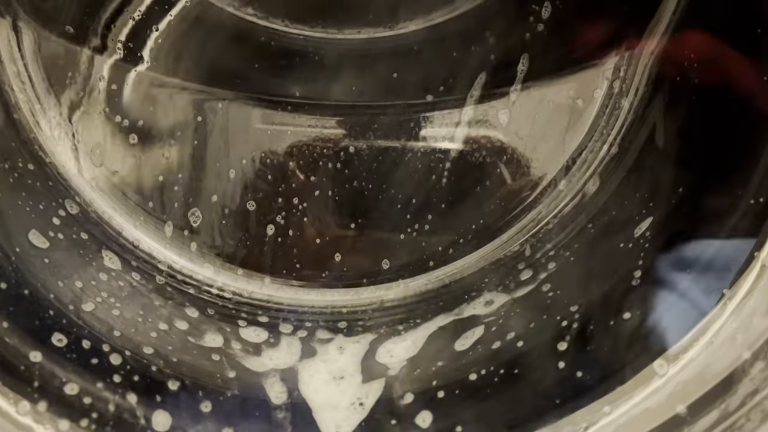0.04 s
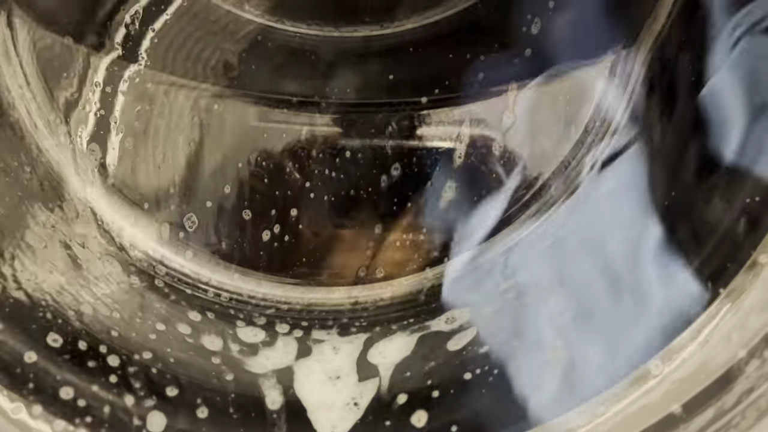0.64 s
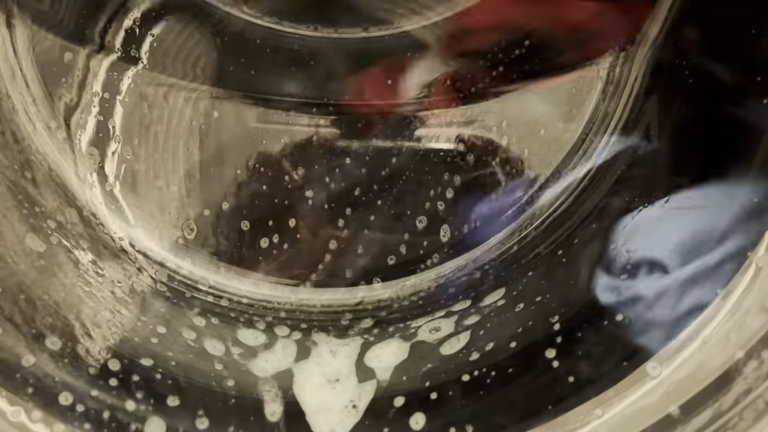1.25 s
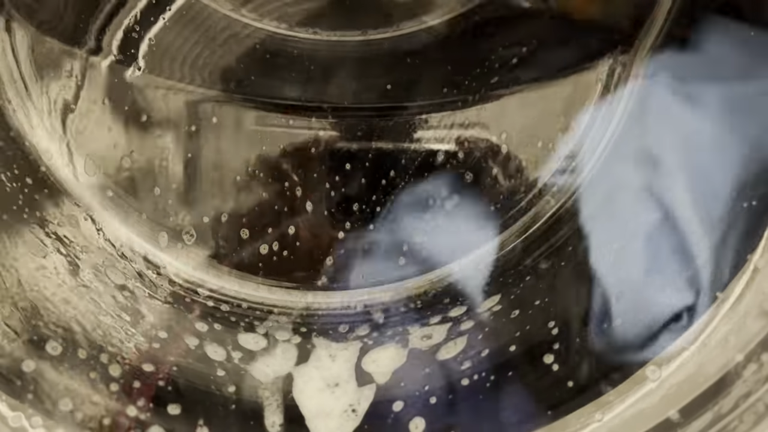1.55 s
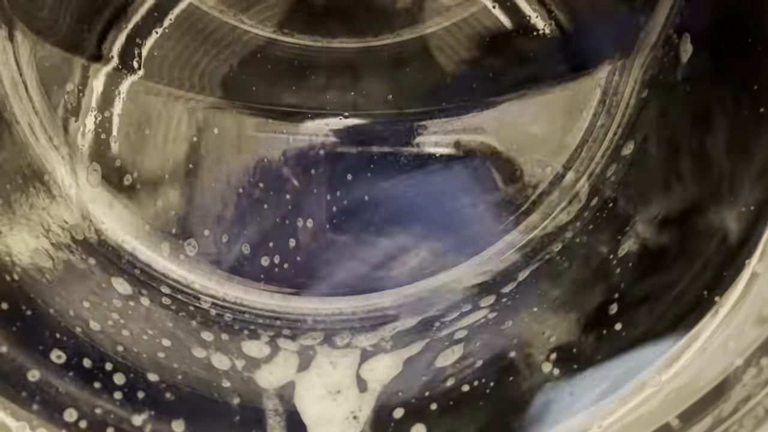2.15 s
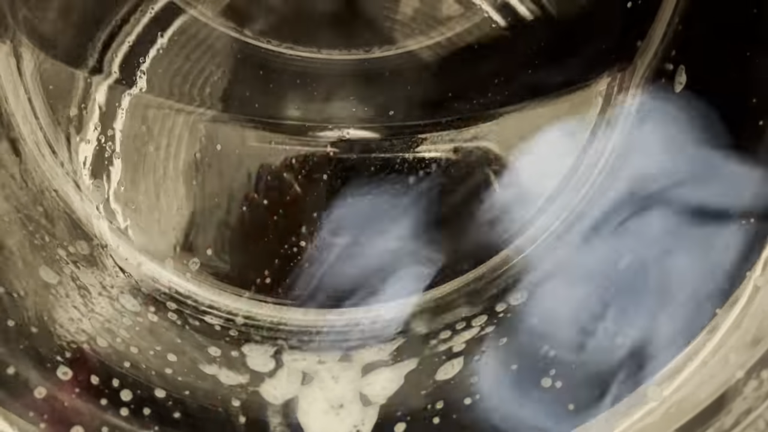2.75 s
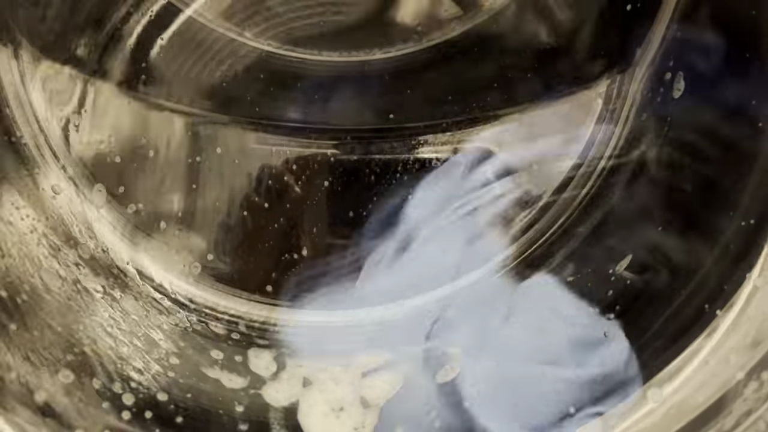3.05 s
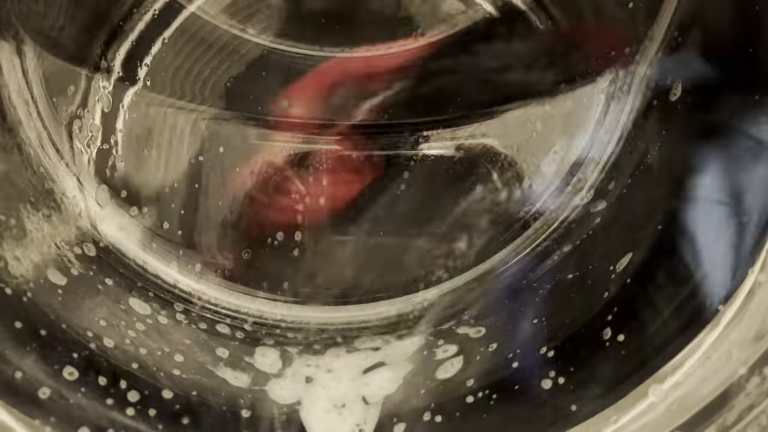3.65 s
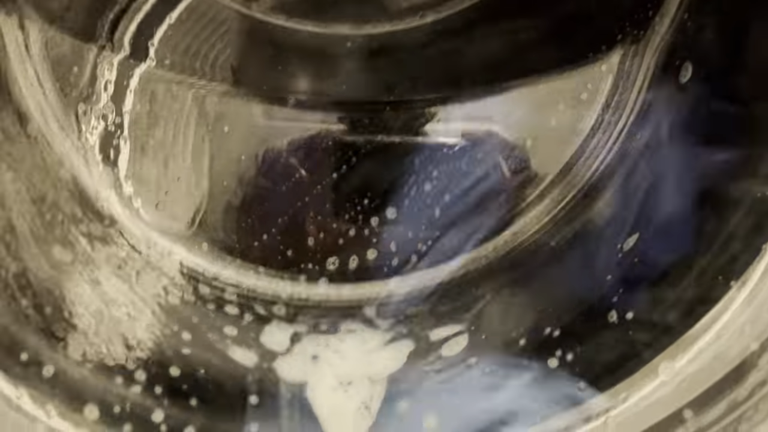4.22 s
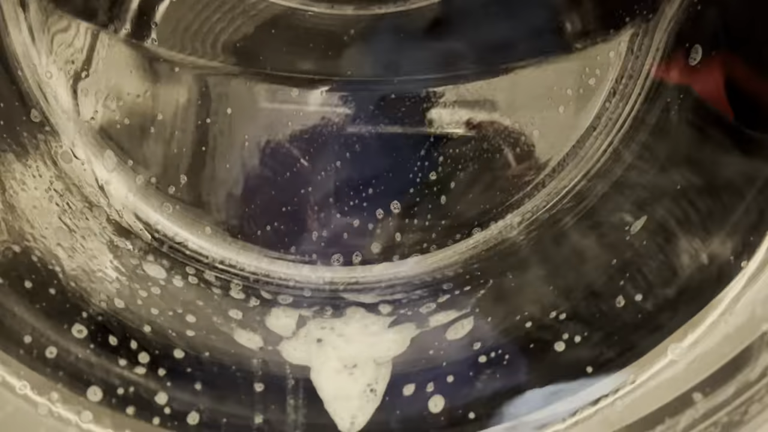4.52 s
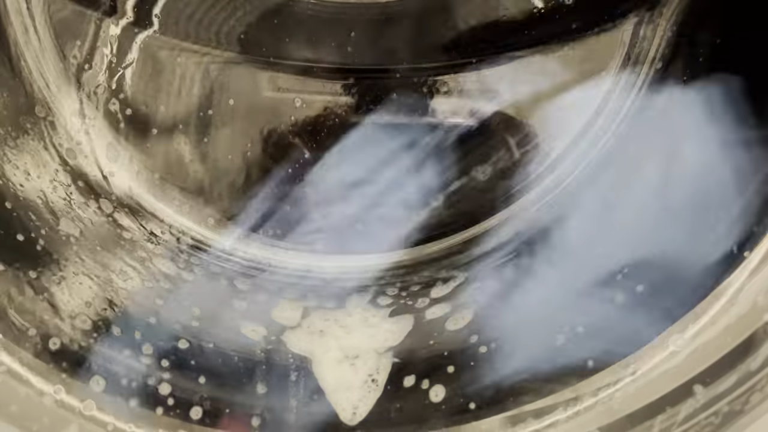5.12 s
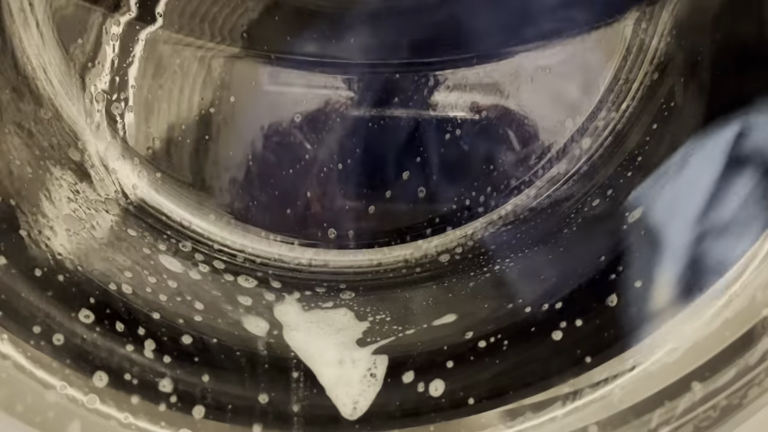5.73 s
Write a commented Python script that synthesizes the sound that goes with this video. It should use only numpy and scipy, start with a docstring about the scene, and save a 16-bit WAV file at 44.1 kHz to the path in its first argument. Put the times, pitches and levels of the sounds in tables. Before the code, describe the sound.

A front-loading washing machine turns with a steady low rumble, a motor hum and a faint, thin whine. Wet laundry slaps the drum and flops into the water at uneven intervals, and the water sloshes, gurgles and spatters. A zip or button ticks on the glass early on, then one heavy knock rings briefly in the steel tub, and more wet smacks follow. The microphone is just outside the glass door.

```python
"""Front-loading washing machine rinsing

Heard just outside the glass door. Wet laundry slaps the turning drum and flops into the water, which
sloshes, bubbles and spatters; a zip or button ticks on the glass. These ring briefly in the steel tub,
over the rumble and hum of the drive and the thin whine of its inverter."""
import sys
import numpy as np
from scipy import signal
from scipy.fft import rfft, irfft, next_fast_len
from scipy.io import wavfile
from scipy.ndimage import uniform_filter1d

SR = 44100
rng = np.random.default_rng(int(sys.argv[2]) if len(sys.argv) > 2 else 0)


def inscribe(sig):
    """Save sig as 16-bit PCM at rate SR to the path in sys.argv[1].

    A 1-D sig is mono; a 2-D sig holds one channel per row.
    Samples are clipped to [-1, 1] before scaling.
    """
    pcm = np.round(np.clip(np.atleast_2d(sig).T, -1, 1) * 32767)
    wavfile.write(sys.argv[1], SR, pcm.astype(np.int16))


N = 259308
TIME_S = np.arange(N) / SR
FFT_SIZE = next_fast_len(N + SR // 2)
FREQ_HZ = np.maximum(np.fft.rfftfreq(FFT_SIZE, 1 / SR), 1)

# Drum and bearing noise. Each row: frequency in Hz, relative level in dB.
DRIVE_SPECTRUM = [(13, -68), (22, -9.5), (125, 1), (167, 0), (493, -12), (598, -9), (880, -16.5),
                  (1120, -16.5), (1530, -24), (1810, -28.5), (3080, -34), (3400, -37.5), (5910, -47),
                  (7000, -53), (9100, -83), (15400, -120)]
# Motor hum. Each row: frequency in Hz, base level in dB.
HUM_PARTIALS = [(70, -56), (114, -55), (240, -82)]
# Tub swinging on its springs. Each row: start in seconds, pitch in Hz, peak in dB.
SPRING_BUMPS = [(3.289, 66, -38), (3.628, 67.5, -46), (5.022, 79, -34.5)]
# Tub and door resonances. Each row: frequency in Hz, width in Hz, relative gain in dB.
TUB_MODES = [(359, 21, 0.5), (618, 41, 5.5), (761, 29, 1.5), (909, 9.1, 1), (1086, 14.5, 4.5),
             (1210, 29, 3), (1532, 22, 8), (1540, 10, -15), (1970, 67, -0.5), (2830, 15, -8), (3230, 57, 0)]
# Ring common to all ticks. Each row: frequency in Hz, width in Hz, relative gain in dB.
TICK_MODES = [(3190, 61, 8), (6130, 130, -3), (9100, 85, -3), (10500, 2900, 1.5), (11700, 270, 10),
              (13300, 370, 4)]
# Zip or button on glass. Each row: start in seconds, level in dB, contact in seconds, spot pitch in Hz.
GLASS_TICKS = [(0.525, -31, 0.0033, 12500), (0.584, -43.5, 0.007, 11650), (0.615, -60, 0.049, 11400),
               (0.78, -24, 0.0026, 12600), (0.853, -27, 0.0059, 10830), (0.888, -41, .008, 12400),
               (1.83, -31, 0.0044, 12400), (1.841, -43, 0.013, 10800), (1.857, -42.5, 0.019, 10800),
               (1.877, -47, 0.0056, 10300), (2.983, -43, 0.0019, 11200), (4.426, -57, .003, 11000),
               (5.608, -50, .004, 11800)]
# Drop impacts. Each row: frequency in Hz, relative level in dB.
SPLASH_SPECTRUM = [(65, -36), (110, -12.5), (250, -12.5), (514, -10), (632, -0.5), (730, -5.5), (915, -8.5),
                   (4640, -21.5), (6450, -23), (8610, -40), (10100, -34), (15000, -46)]
# Large air pockets. Each row: start in seconds, pitch in Hz, level in dB, glide as a share of pitch.
AIR_GULPS = [(0.0, 343, -19, 0.25), (0.0, 532, -25.5, -0.07), (0.017, 408, -21, 0.21),
             (0.046, 650, -36, 0.11), (0.938, 187.4, -27, 0.04), (1.06, 324.4, -35, 0.03),
             (1.265, 260, -39, 0.013), (2.513, 152, -29.5, 0.016), (3.125, 252, -35, 0.04),
             (3.305, 161, -32, 0.13), (3.415, 600, -27.5, 0.0017), (3.474, 447, -35, 0.077),
             (3.504, 302, -33, -0.048), (4.468, 670, -24, 0.054), (4.488, 378, -25.5, 0.067),
             (4.506, 263, -28, 0.033), (4.63, 376, -38, 0.16), (4.98, 650, -26.5, -0.0037),
             (5.051, 330, -32, 0.11), (5.335, 263, -33, 0.04), (5.615, 292, -19, 0.23),
             (5.637, 374, -20.5, -0.03)]
# Air from wet folds. Each row: start in seconds, pitch in Hz, level in dB, squeeze time in seconds.
FOLD_SMACKS = [(0.167, 910, -39, 0.016), (0.49, 1190, -48, 0.012), (0.594, 1170, -41, .008),
               (0.728, 6600, -32.5, .003), (0.737, 1370, -39, .008), (1.338, 1130, -35, 0.013),
               (1.57, 1090, -48, 0.0048), (1.673, 900, -37.5, .014), (1.769, 2080, -45, 0.019),
               (2.159, 1500, -41.5, 0.0059), (2.511, 1010, -43, 0.0056), (2.568, 1200, -39, 0.014),
               (2.696, 1490, -36.5, 0.0081), (2.713, 1105, -31, 0.016), (2.764, 1110, -37, .01),
               (3.088, 2200, -49, .008), (3.17, 2800, -27, 0.0093), (3.173, 1190, -39, .014),
               (3.413, 1520, -52, 0.0041), (3.474, 1520, -38, .012), (3.886, 2140, -23.5, 0.0099),
               (3.891, 940, -24.5, 0.012), (4.254, 2020, -40, .025), (4.314, 1230, -39, 0.021),
               (4.425, 1270, -36, 0.015), (5.02, 1400, -39, .022), (5.043, 2300, -48, 0.012),
               (5.127, 1510, -57, .008), (5.325, 1150, -43, 0.0064), (5.609, 2360, -32, 0.016),
               (5.617, 1440, -24, .014)]
# Heavy bundles on steel. Each row: start in seconds, level in dB, pitch region in Hz.
BUNDLE_KNOCKS = [(0.737, -23, 640), (1.882, -11.5, 974), (1.885, -28, 1240), (3.175, -27, 2820),
                 (3.89, -35, 2050)]
# Flat cloth on the drum wall. Each row: start in seconds, level in dB, pitch in Hz.
CLOTH_SLAPS = [(0.737, -34, 680), (1.308, -35, 700), (1.8795, -30, 2500), (1.8825, -24, 1050),
               (2.156, -40, 1400), (2.511, -37, 800), (2.713, -27, 850), (3.1695, -27, 2700),
               (3.173, -24, 1040), (3.415, -32, 650), (3.883, -34, 2100), (3.892, -21.5, 850),
               (4.4245, -26, 3600), (4.601, -32, 650), (4.802, -38, 700), (4.981, -26, 680),
               (5.276, -44, 900), (5.61, -20, 3000), (5.617, -26, 640)]
# Thud, slap, splat and spray of a landing. Each row: low edge in Hz, high edge in Hz.
PART_BANDS = [(130, 419), (450, 998), (1050, 4300), (3400, 34000)]
# The same four parts. Each row: base level in dB, dB per dB of strength, dB per dB of wetness.
PART_LEVELS = [(-36.5, 0.7446, -0.52), (-35, 1.18, 0.09), (-45, 1.29, 1.3666), (-57.5, 0.7, 2.12)]
# Wet laundry landing. Each row: time in seconds, contact in seconds, strength in dB, wetness in dB
# (above 0 a bright smack, below 0 a dull plop).
LANDINGS = [(0.0, 0.019, -4.5, -1), (0.152, 0.0041, -7, 3.5), (0.218, 0.0015, -18, 5),
            (0.316, 0.042, -13, 0), (0.47, 0.0011, -3, 6), (0.488, 0.005, -5.5, 7.5),
            (0.587, 0.0081, -3, 0.5), (0.727, 0.0046, 3.5, 3), (0.85, 0.038, -8, 2.5),
            (0.917, 0.0056, -3.5, -3), (1.038, 0.0012, -7.5, -12), (1.243, 0.0031, -4.5, -0.5),
            (1.305, 0.0012, -1.5, -1), (1.335, 0.0082, -8, -1.5), (1.569, 0.019, -9.5, 1),
            (1.664, 0.0036, -3, -1), (1.811, 0.015, -0.5, 4.5), (1.879, 0.0023, 13, -2.5),
            (2.082, 0.002, -11.5, 3.5), (2.152, 0.0062, -7, 2), (2.507, 0.0071, -0.5, 0),
            (2.695, 0.0015, -3.5, 5), (2.712, 0.0058, 2, 1), (2.839, 0.0012, -3, 0.5),
            (2.984, 0.0003, -2, 6), (3.084, 0.0074, -2, 3.5), (3.167, 0.00061, 8.5, 5),
            (3.289, 0.0022, -4.5, 2), (3.411, 0.00098, -1.5, 2.5), (3.454, 0.0065, 0, -2),
            (3.617, 0.0025, -2, -2.5), (3.645, 0.0034, -0.5, 2), (3.88, 0.0064, 5.5, 3),
            (4.053, 0.0054, -11, 8.5), (4.077, 0.0019, -1, 5), (4.079, 0.013, -5, 0.5),
            (4.252, 0.027, -8.5, 2), (4.345, 0.013, -7, 0.5), (4.423, 0.0032, 5, 4),
            (4.465, 0.00076, -0.5, -8), (4.601, 0.0024, -3.5, -0.5), (4.622, 0.0061, -1, -4),
            (4.797, 0.00084, -5, 1), (4.937, 0.031, -5.5, 0), (4.98, 0.003, -10, -4),
            (5.021, 0.018, -4, -2.5), (5.118, 0.004, -7, 1.5), (5.272, 0.00064, 0, 1),
            (5.484, 0.0016, -6, -0.5), (5.608, 0.00065, 9.5, 7), (5.617, 0.01, 5, -4),
            (5.808, 0.0066, -10, -0.5)]


def undb(db):
    """Decibels to gain."""
    return 10 ** (np.asarray(db) / 20)


def unit_rms(x):
    """Scale to rms 1."""
    return x / np.sqrt(np.mean(x ** 2))


def unit_energy(x):
    """Scale each channel to energy 1."""
    return x / np.sqrt(np.sum(x ** 2, axis=-1, keepdims=True))


def add_at(out, start_s, sound):
    """Mix a sound into out, in place."""
    start = int(start_s * SR)
    out[start:start + len(sound)] += sound


def leak(x, decay_s):
    """Leaky integrator, gain 1 at DC."""
    keep = np.exp(-1 / (decay_s * SR))
    return signal.lfilter([1 - keep], [1, -keep], x)


def filt(x, response):
    """Apply a response given on FREQ_HZ."""
    return irfft(rfft(x, FFT_SIZE) * response, FFT_SIZE)[..., :N]


def colour(points):
    """Response through (Hz, dB) points."""
    hz, db = np.transpose(points)
    return undb(np.interp(np.log(FREQ_HZ), np.log(hz), db))


def mode(hz, width_hz):
    """One resonance, gain 1 at its centre."""
    return 1 / (1 + 1j * (FREQ_HZ ** 2 - hz ** 2) / (FREQ_HZ * width_hz))


def band(x, lo_hz, hi_hz):
    """Causal band-pass, capped below Nyquist."""
    sos = signal.butter(3, [lo_hz, min(hi_hz, SR / 2 - 1)], "band", fs=SR, output="sos")
    return signal.sosfilt(sos, x)


def walk(rate_hz):
    """Smooth random drift, rms 1."""
    hold = int(SR / rate_hz)
    steps = np.repeat(rng.standard_normal(N // hold + 1), hold)
    return unit_rms(uniform_filter1d(uniform_filter1d(steps, hold), hold)[:N])


def impacts(rate_hz, spread_db):
    """Dense tiny impacts of very unequal size."""
    size = undb(spread_db * np.minimum(rng.exponential(size=N), 4))
    return rng.standard_normal(N) * size * (rng.random(N) < rate_hz / SR)


def stereo(mid, side, wide_hz):
    """Long waves reach both ears alike, short ones unrelated."""
    share = 1 / np.sqrt(1 + (wide_hz / FREQ_HZ) ** 2)
    norm = 1 / np.sqrt(1 + share ** 2)
    return filt(mid, norm) + np.array([[1], [-1]]) * filt(side, share * norm)


def drive(stir_db, noise_db=-46.5, sway_db=1, wander_rad=1.65, whine_hz=15030, whine_db=-63.5):
    """Drum and bearings rumble under the shifting load; the motor hums, its inverter whines."""
    effort = undb(0.087 * stir_db - 1.4 * walk(4.84))
    noise = filt(rng.standard_normal((2, N)), colour(DRIVE_SPECTRUM))
    noise = unit_rms(stereo(*noise, wide_hz=560)) * undb(noise_db + sway_db * walk(5.4))
    rumble = filt(noise, 1 / (1 + (FREQ_HZ / 160) ** 4))
    hum = 0
    for hz, db in HUM_PARTIALS:
        amplitude = np.sqrt(2) * undb(db + 2 * walk(9))
        hum += amplitude * np.sin(2 * np.pi * hz * TIME_S + wander_rad * walk(26))
    whine = unit_rms(filt(rng.standard_normal(N), mode(whine_hz, width_hz=110) ** 3))
    return effort * (rumble + hum) + (noise - rumble) + undb(whine_db) * whine


def bumps(swell_s=0.022):
    """The load bumps the sprung tub, which gives softly and swings a few cycles."""
    out = 0
    for start_s, hz, db in SPRING_BUMPS:
        age_s = np.maximum(TIME_S - start_s, 0)
        swell = (age_s / swell_s * np.exp(1 - age_s / swell_s)) ** 2
        out += undb(db) * swell * np.sin(2 * np.pi * hz * age_s)
    return out


def pool_resonance(x, hz=240, width_hz=16, gain_db=8, drift_octaves=0.082):
    """The tub's lowest resonance carries the water, so it drifts as the load shifts."""
    pitch_hz = hz * 2 ** (drift_octaves * walk(6.8))
    carrier = np.exp(2j * np.pi * np.cumsum(pitch_hz) / SR)
    return undb(gain_db) * np.real(carrier * leak(x / carrier, decay_s=1 / (np.pi * width_hz)))


def tub_body(x):
    """Standing resonances of the steel plus the drifting one of the pool."""
    steel = 1 + sum(undb(db) * mode(hz, width_hz) for hz, width_hz, db in TUB_MODES) / 2
    return filt(x, steel) + pool_resonance(x)


def tub_echoes(x, t60_low_s=0.39, t60_high_s=0.27, direct_db=-9, ring_db=-2.5):
    """Dense echoes in the steel tub; the tumbling load keeps changing their pattern."""
    noise = rng.standard_normal((2, N))
    low = filt(noise, 1 / (1 + (FREQ_HZ / 900) ** 2))
    high = noise - low
    hop, age_s = SR // 16, TIME_S[:SR // 2]
    fade_low, fade_high = undb(-60 * age_s / t60_low_s), undb(-60 * age_s / t60_high_s)
    echoes, padded = np.zeros((2, N + SR)), np.pad(x, (hop, 2 * hop))
    window = np.sin(np.pi * np.arange(2 * hop) / (2 * hop))
    for start in range(0, N + hop, hop):
        pick = rng.integers(N - len(age_s)) + np.arange(len(age_s))
        tail = unit_energy(low[:, pick] * fade_low + high[:, pick] * fade_high)
        frame = window * padded[start:start + 2 * hop]
        echo = signal.fftconvolve(frame[None], tail, axes=1)
        echoes[:, start:start + echo.shape[1]] += echo
    ring = stereo(*tub_body(echoes[:, hop:hop + N]), wide_hz=332)
    return undb(ring_db) * ring + undb(direct_db) * x


def door(x, t60_s, ring_db, direct_db):
    """The glass bowl rings very briefly."""
    tail = unit_energy(rng.standard_normal((2, N)) * undb(-60 * TIME_S / t60_s))
    return undb(direct_db) * x + undb(ring_db) * filt(x, rfft(tail, FFT_SIZE))


def ticks(top_hz=14500, spot_db=16, spot_width_hz=130, rise_s=0.000079, detune=0.0043):
    """Metal clicks on the glass or grazes it; each spot of contact favours its own pitch."""
    out, age_s = np.zeros(N + SR), TIME_S[:SR // 8]
    grit = unit_rms(impacts(rate_hz=15000, spread_db=3))
    for start_s, db, contact_s, spot_hz in GLASS_TICKS:
        start = int(start_s * SR)
        contact = (1 - np.exp(-age_s / rise_s)) * np.exp(-age_s / contact_s)
        force = contact * grit[start:start + len(age_s)]
        ring = 0
        for hz, width_hz, mode_db in TICK_MODES + [(spot_hz, spot_width_hz, spot_db)]:
            pitch_hz = hz * (1 + detune * rng.standard_normal())
            envelope = undb(mode_db) * width_hz * np.exp(-np.pi * width_hz * age_s)
            ring += envelope * np.cos(2 * np.pi * pitch_hz * age_s)
        add_at(out, start_s, undb(db) * signal.fftconvolve(force, unit_energy(ring)))
    return filt(out[:N], 1 / (1 + (FREQ_HZ / top_hz) ** 20))


def bubble(hz, cycles, glide):
    """An air pocket rings briefly; positive glide lifts its pitch as it surfaces."""
    age = TIME_S[:int(2 * cycles / hz * SR)] * hz / cycles
    envelope = np.exp(-np.pi * age) * (1 - np.exp(-2 * cycles * age))
    return envelope * np.sin(2 * np.pi * cycles * age * (1 + glide * age / 2))


def swarm(count, lo_hz, hi_hz, cycles, spread_db, glide):
    """Bubbles of all sizes at random times."""
    out = np.zeros(N + SR)
    for when, pitch, size in rng.random((count, 3)):
        ring = bubble(lo_hz * (hi_hz / lo_hz) ** pitch, cycles, glide)
        add_at(out, when * N / SR, ring * undb(-spread_db * np.log(max(size, 0.05))))
    return unit_rms(out[:N])


def water(stir_db, period_s=0.8, crest_s=0.15, swing_db=3, gurgle_db=-52, drip_db=-62, fizz_db=-66):
    """Pockets gurgle as the load churns and the pool swings; drops trickle off the drum wall."""
    surge_db = swing_db * np.cos(2 * np.pi * (TIME_S - crest_s) / period_s) + walk(4)
    slosh, trickle = undb(0.34 * stir_db + surge_db), undb(0.2 * stir_db + surge_db)
    gurgle = swarm(count=650, lo_hz=132.5, hi_hz=990, cycles=5.1, spread_db=6.5, glide=0.087)
    drips = swarm(count=700, lo_hz=560, hi_hz=1600, cycles=6, spread_db=4, glide=0.15)
    patter = filt(impacts(rate_hz=1000, spread_db=3.6), colour(SPLASH_SPECTRUM))
    fizz = unit_rms(band(patter, 780, 11000))
    return slosh * undb(gurgle_db) * gurgle + trickle * (undb(drip_db) * drips + undb(fizz_db) * fizz)


def gulps():
    """The biggest pockets escape one by one; higher ones die sooner."""
    out = np.zeros(N + SR)
    for start_s, hz, db, glide in AIR_GULPS:
        add_at(out, start_s, undb(db) * bubble(hz, cycles=14, glide=glide))
    return out[:N]


def run_off(spray, drain_s=0.004, gain_db=-42, flicker_db=3.5):
    """A film of spray crackles as it runs off the glass; more spray adds less and less."""
    film = leak(spray, drain_s)
    crackle = impacts(rate_hz=4000, spread_db=3.3)
    hiss = unit_rms(band(band(crackle, 9800, 12300), 9800, 12300))
    return hiss * np.sqrt(film + 1e-5) * undb(gain_db + flicker_db * walk(59))


def spatter(splat, fall_s=0.026, gain_db=-33, spurt_db=4):
    """Thrown drops fall back on cloth and steel in uneven spurts."""
    airborne = leak(splat, fall_s)
    patter = filt(impacts(rate_hz=500, spread_db=4), colour(SPLASH_SPECTRUM))
    drops = unit_rms(band(patter, 1200, 8000))
    return drops * (airborne + 1e-6) ** 0.64 * undb(gain_db + spurt_db * walk(45))


def smacks(count=18, spread_octaves=0.33):
    """Wet folds shut and squeeze out a cluster of like-sized pops, the later ones weaker."""
    out = np.zeros(N + SR)
    for start_s, hz, db, squeeze_s in FOLD_SMACKS:
        for k, (late, size) in enumerate(rng.random((count, 2))):
            air_left = 1 - (k + late) / (count + 1)
            pop = bubble(hz * 2 ** (spread_octaves * (2 * size - 1)), cycles=4.8, glide=0.02)
            add_at(out, start_s - squeeze_s * np.log(air_left), undb(db) * np.sqrt(air_left) * pop)
    return out[:N]


def knocks(reach_octaves=0.16, gain=0.27):
    """A heavy bundle rings the steel's resonances near its pitch region."""
    out, age_s = np.zeros(N + SR), TIME_S[:SR // 2]
    for start_s, db, region_hz in BUNDLE_KNOCKS:
        for hz, width_hz, _ in TUB_MODES:
            nearness = np.exp(-(np.log2(hz / region_hz) / reach_octaves) ** 2)
            ring = np.sin(2 * np.pi * hz * age_s) * np.exp(-np.pi * width_hz * age_s)
            add_at(out, start_s, undb(db) * nearness * ring)
    return gain * out[:N]


def slaps(count=8, span_s=0.013, fall_db=-11, spread_octaves=0.33):
    """Flat cloth hits the steel in one abrupt pulse; the rest of it follows in weaker ones."""
    out = np.zeros(N + SR)
    for start_s, db, hz in CLOTH_SLAPS:
        for k, (early, size, polarity) in enumerate(rng.random((count, 3))):
            progress = max(k - early, 0) / count
            octaves = spread_octaves * (2 * size - 1) if k else 0
            pulse = np.sign(polarity - 0.5) * bubble(hz * 2 ** octaves, cycles=2.06, glide=0.02)
            add_at(out, start_s + progress * span_s, undb(db + fall_db * progress) * pulse)
    return out[:N]


def small_landings(count=24, contact_s=0.0062, strength_db=-16, wetness_db=-1, scatter_db=2):
    """Sleeves and corners drop at random; rows as in LANDINGS."""
    when, strength, wetness = rng.random((count, 3)).T
    strengths_db = strength_db + scatter_db * (2 * strength - 1)
    wetnesses_db = wetness_db + scatter_db * (2 * wetness - 1)
    return list(zip(when * N / SR, [contact_s] * count, strengths_db, wetnesses_db))


def landing_forces(give_s=0.0028, thud_lag_s=0.0028, stream_s=0.011, stream_db=-22):
    """Envelopes of the four parts: water streams ahead of the cloth, whose soft weight thuds last."""
    forces_squared = np.zeros((4, N + 2 * SR))
    age_s = np.arange(-SR // 16, SR // 4) / SR
    lag_s = np.array([[thud_lag_s], [0], [0], [0]])
    stream = undb(stream_db) * np.exp(-abs(age_s) / stream_s)
    base_db, per_strength, per_wetness = np.transpose(PART_LEVELS)
    for time_s, contact_s, strength_db, wetness_db in LANDINGS + small_landings():
        # more water cushions the thud, throws more splat and spray
        part_db = base_db + per_strength * strength_db + per_wetness * wetness_db
        progress = np.maximum(age_s, 0) / (contact_s + give_s + lag_s)
        shape = progress * np.exp(1 - progress) + stream
        start = SR + int((time_s + age_s[0]) * SR)
        forces_squared[:, start:start + len(age_s)] += (undb(part_db)[:, None] * shape) ** 2
    return np.sqrt(forces_squared[:, SR:SR + N])


def churn_db(thud, settle_s=0.38):
    """Agitation about its mean: each thud stirs the load, then it settles."""
    stir_db = 10 * np.log10(leak(thud ** 2, settle_s) + 1e-7)
    return stir_db - np.mean(stir_db)


def flops(forces, burst_db=1, wash_db=-2, t60s_s=(0.42, 0.38, 0.36, 0.33)):
    """Each landing throws a burst of drops; those hitting all over the tub merge into a wash."""
    grains = np.array([impacts(rate_hz=9000, spread_db=2.6) for _ in range(3)])
    splash = filt(grains, colour(SPLASH_SPECTRUM))
    burst, wash = 0, 0
    for force, edges_hz, t60_s in zip(forces, PART_BANDS, t60s_s):
        drops = unit_rms(band(splash, *edges_hz))
        stored_energy = leak(force ** 2, decay_s=t60_s / np.log(1e6))
        burst += force * drops[0]
        wash += np.sqrt(stored_energy) * drops[1:]
    return undb(burst_db) * burst, undb(wash_db) * stereo(*tub_body(wash), wide_hz=298)


def scene():
    """Laundry and water in the tub, ticks and spray on the door, the drive underneath."""
    forces = landing_forces()
    thud, _, splat, spray = forces
    clicks, pockets, steel, pops, cloth = ticks(), gulps(), knocks(), smacks(), slaps()
    burst, wash = flops(forces)
    stir_db, drops = churn_db(thud), spatter(splat)
    split = np.sqrt(0.5)  # a landing part echoes from one spot, part scatters
    wet = split * burst + water(stir_db) + drops + undb(-10) * pockets + undb(-2) * pops
    hits = undb(-29) * clicks + undb(-16) * steel + undb(-5) * cloth
    tub = tub_echoes(wet + hits) + split * wash + steel + undb(-4) * pockets
    near = undb(-5) * pops + cloth + undb(-6) * drops
    glass = door(near, t60_s=0.047, ring_db=4.5, direct_db=-4.5)
    glass += door(clicks, t60_s=0.074, ring_db=-6, direct_db=-2)
    return tub + glass + run_off(spray) + bumps() + drive(stir_db)


def record(dry, lag_s=0.000026, low_cut_hz=30, top_hz=15800):
    """Band-limited microphone with a treble notch; its left port is brighter and hears first."""
    notch = (1 - mode(8400, width_hz=820)) ** 2
    low_cut = 1 / np.sqrt(1 + (low_cut_hz / FREQ_HZ) ** 4)
    left = colour([(1000, -0.2), (2200, 1.0), (4500, 2.5), (8000, -0.15)])
    right = np.exp(-2j * np.pi * FREQ_HZ * lag_s) / left
    heard = filt(dry, notch * low_cut * np.array([left, right]))
    return signal.sosfilt(signal.ellip(8, 0.2, 70, top_hz, fs=SR, output="sos"), heard)


dry = scene()
out = record(dry)
inscribe(out)
```